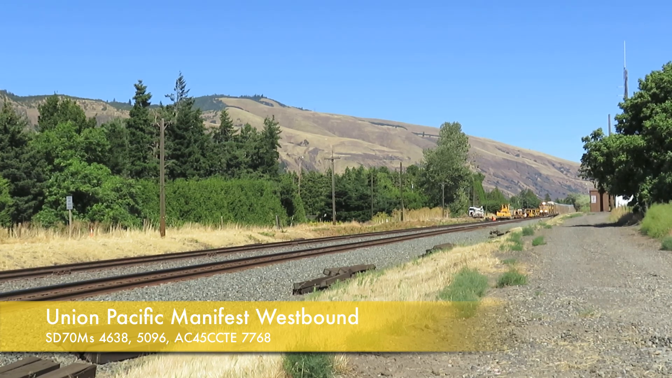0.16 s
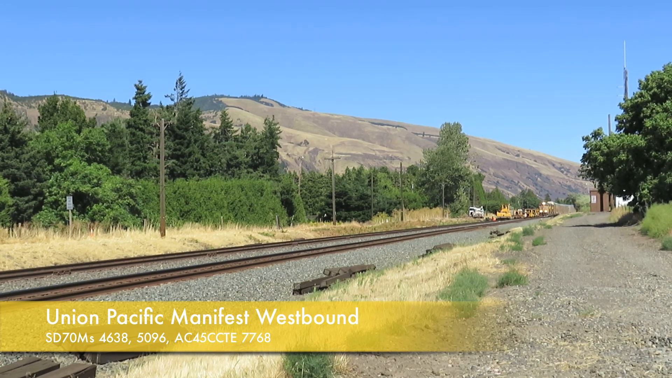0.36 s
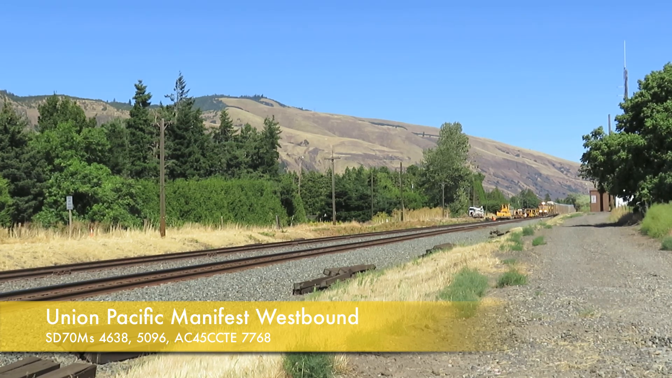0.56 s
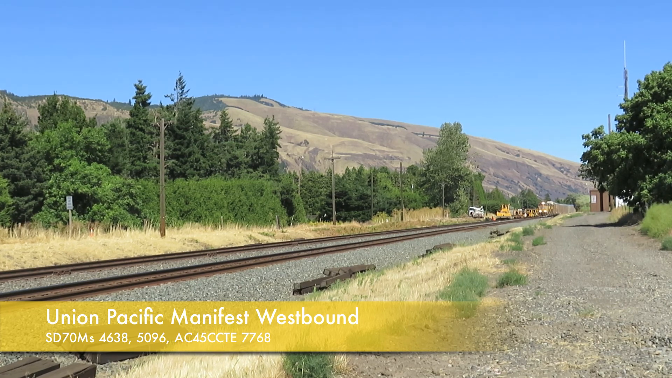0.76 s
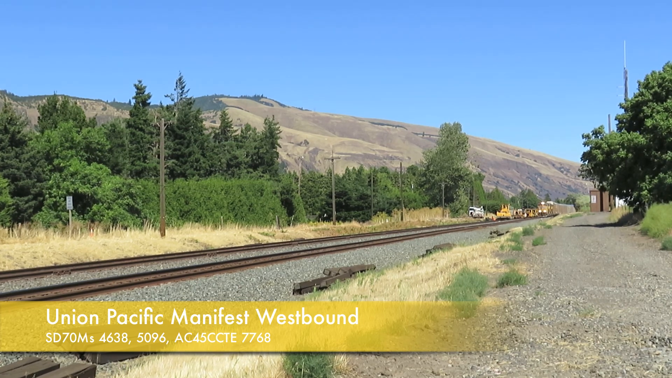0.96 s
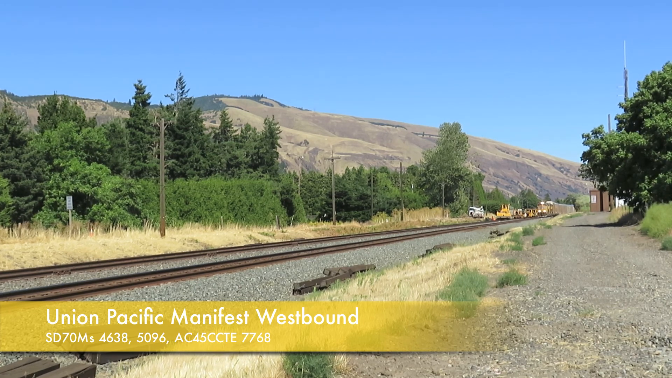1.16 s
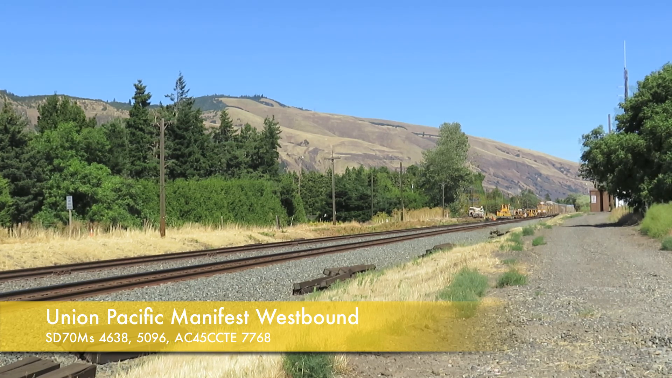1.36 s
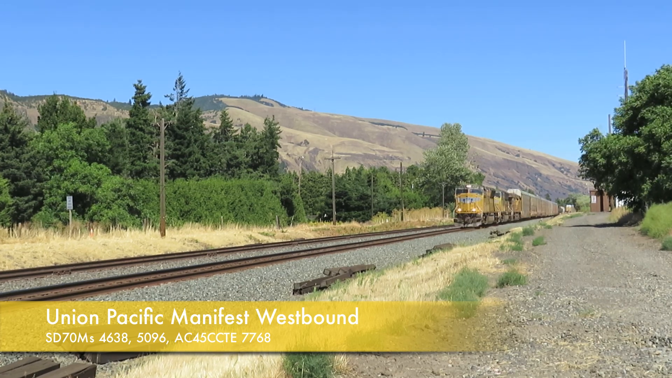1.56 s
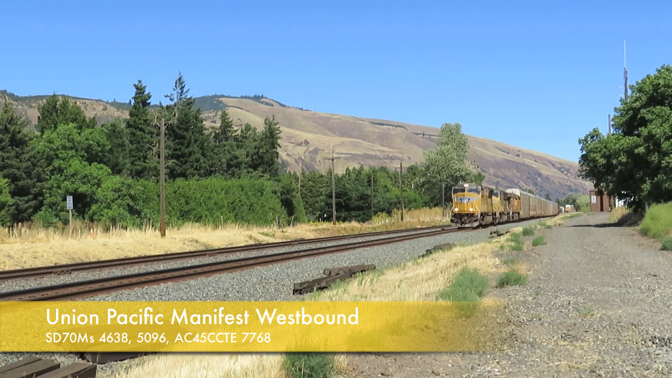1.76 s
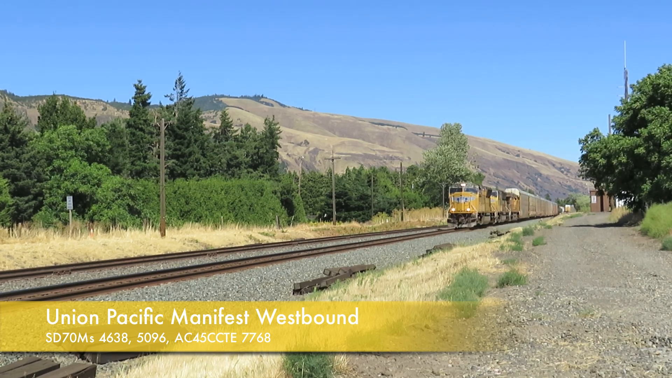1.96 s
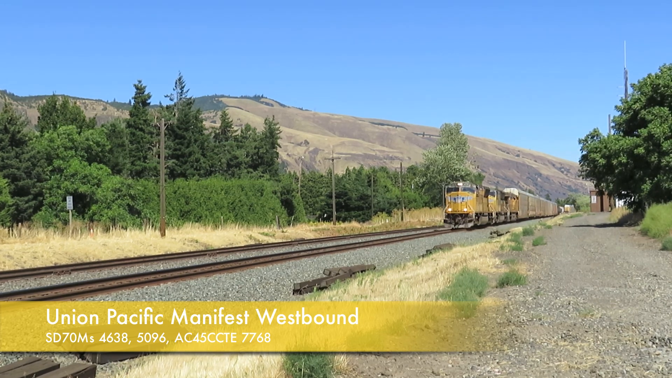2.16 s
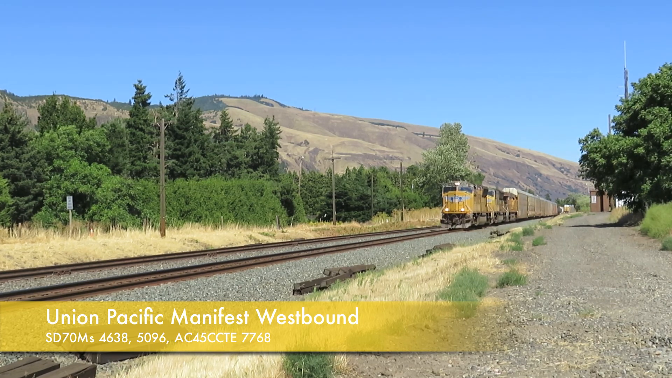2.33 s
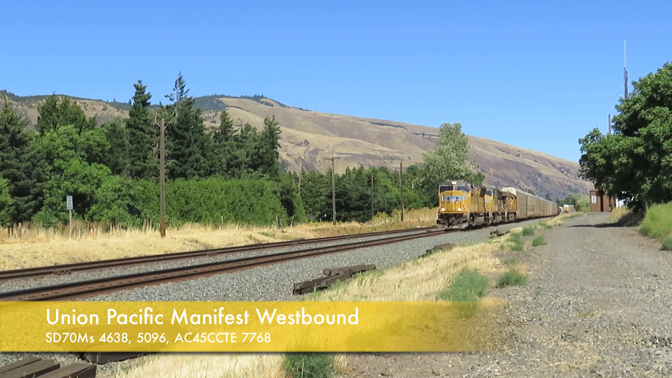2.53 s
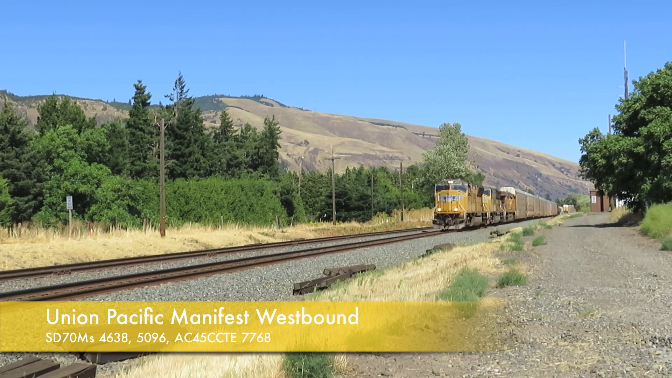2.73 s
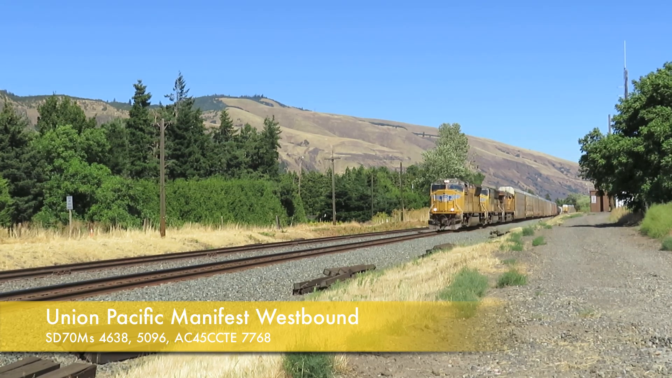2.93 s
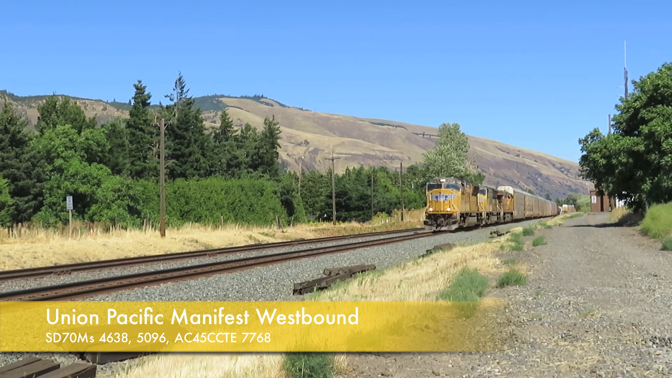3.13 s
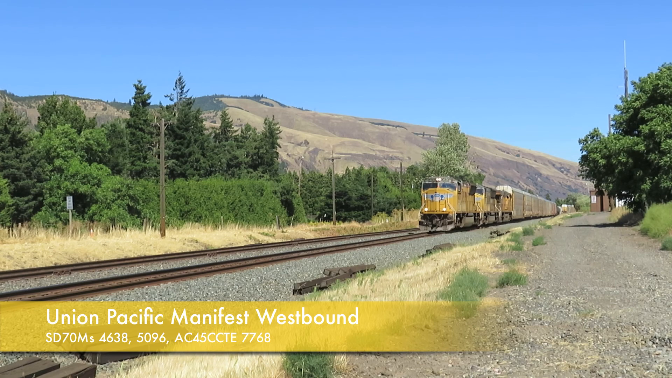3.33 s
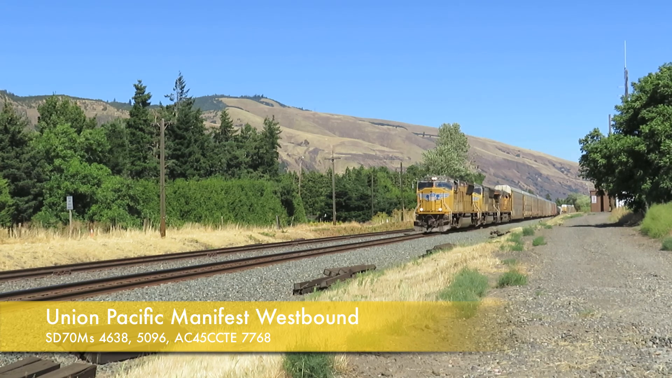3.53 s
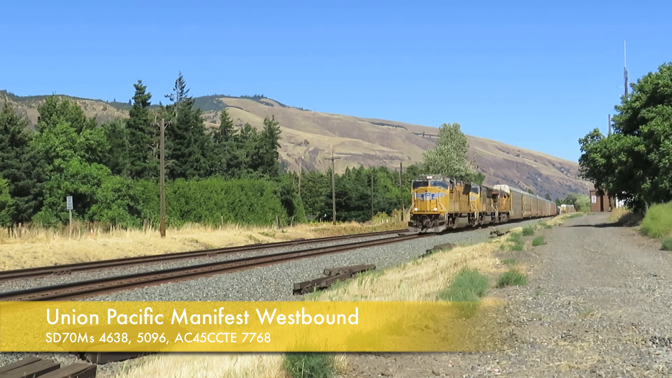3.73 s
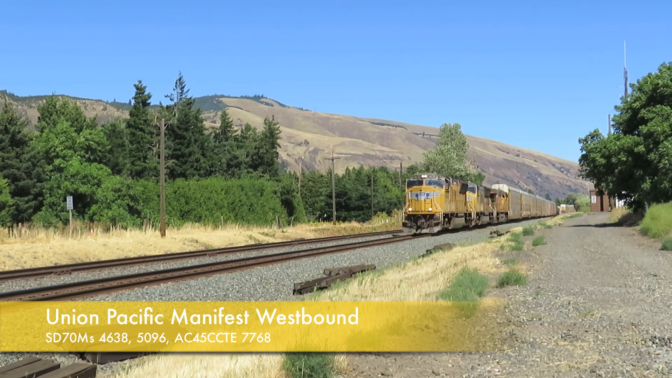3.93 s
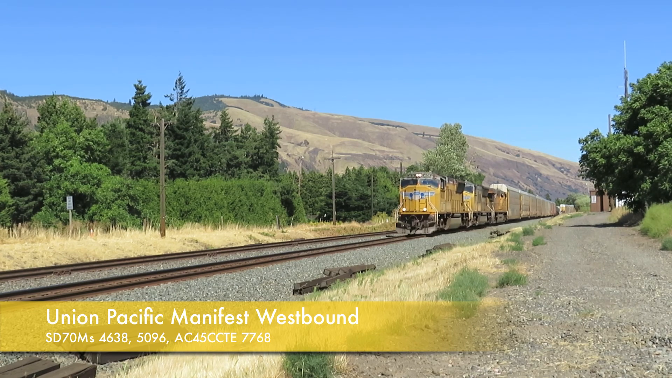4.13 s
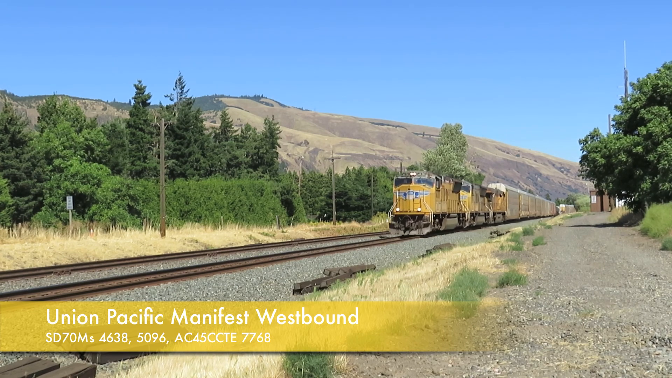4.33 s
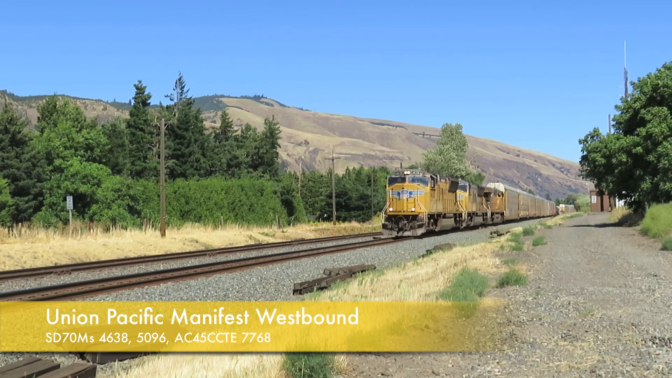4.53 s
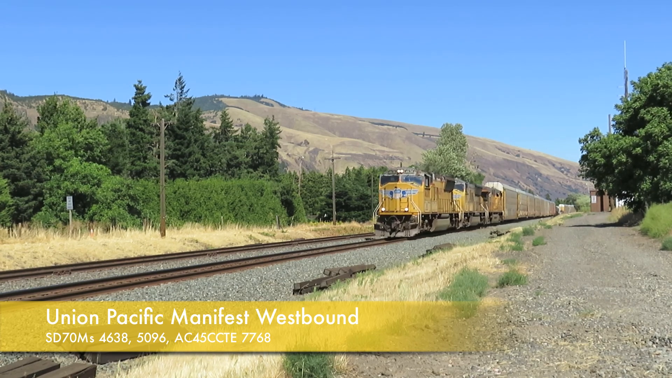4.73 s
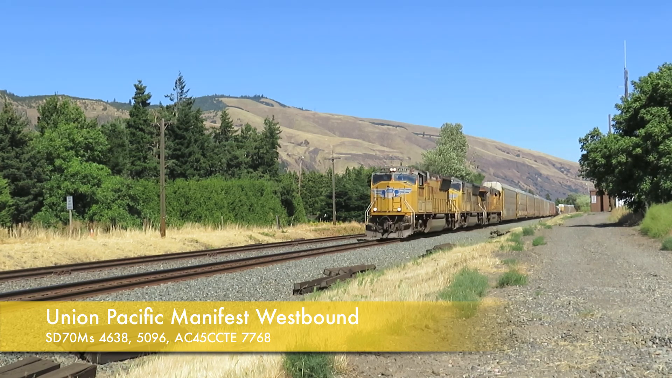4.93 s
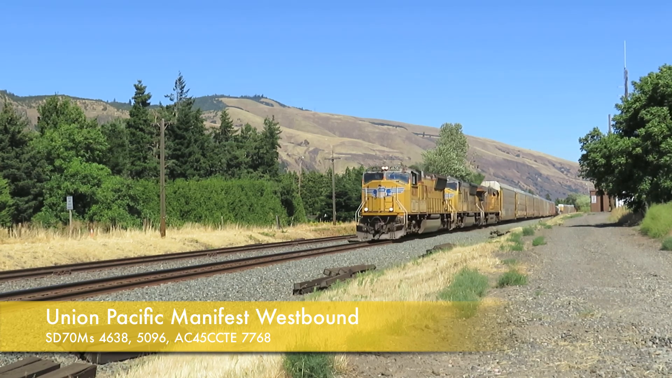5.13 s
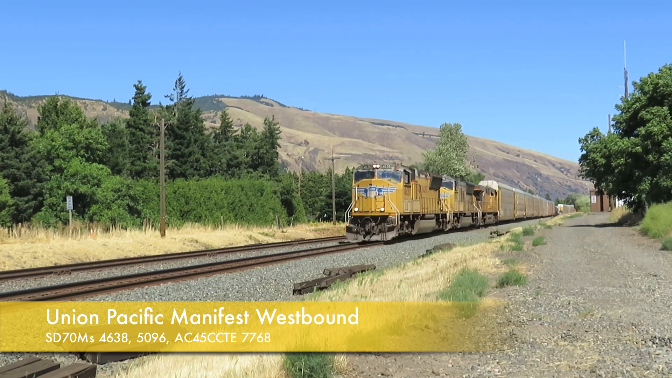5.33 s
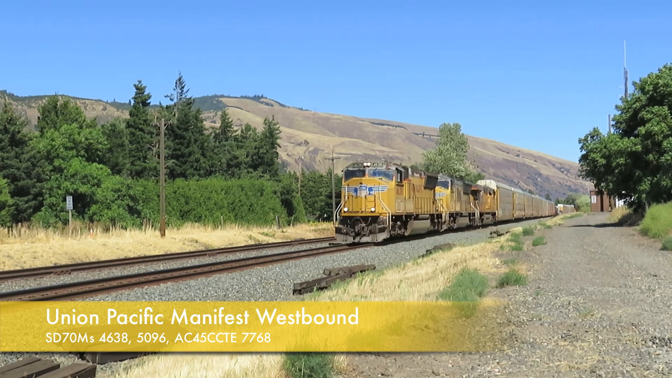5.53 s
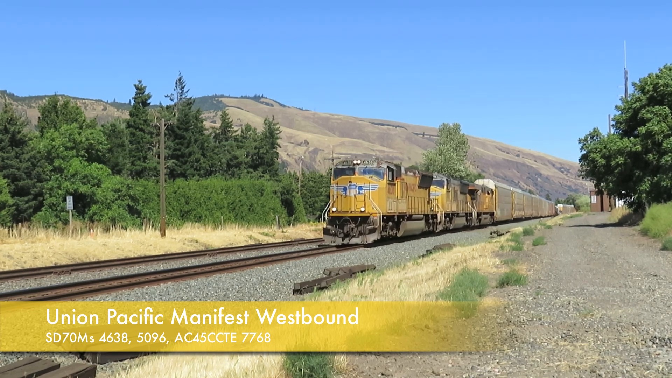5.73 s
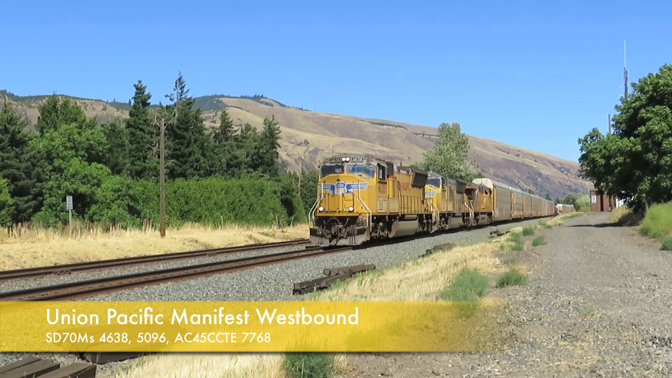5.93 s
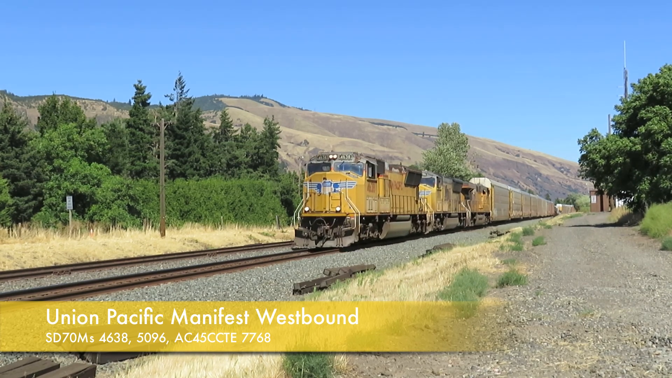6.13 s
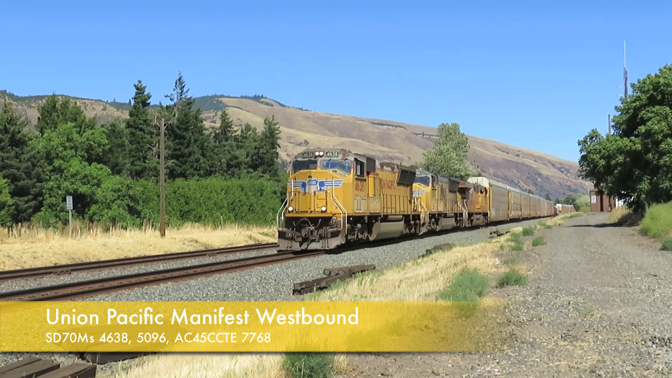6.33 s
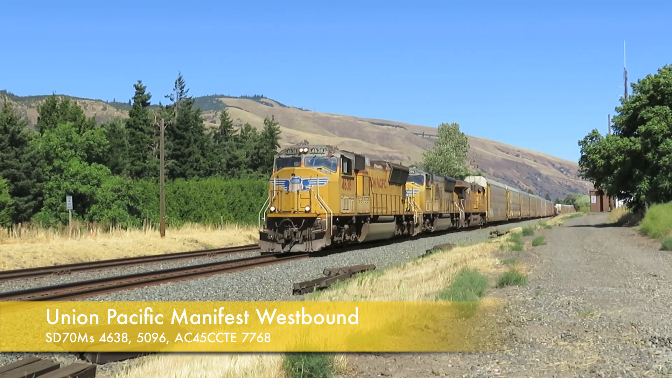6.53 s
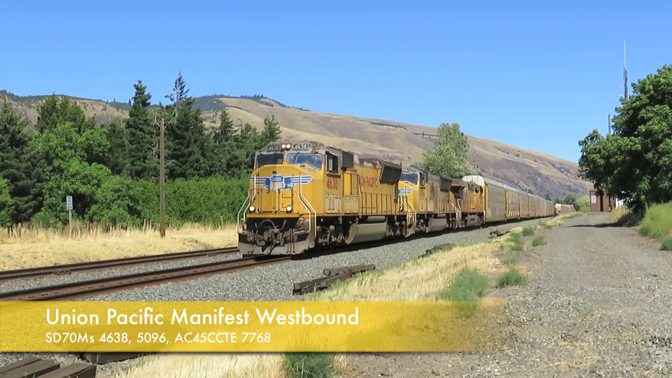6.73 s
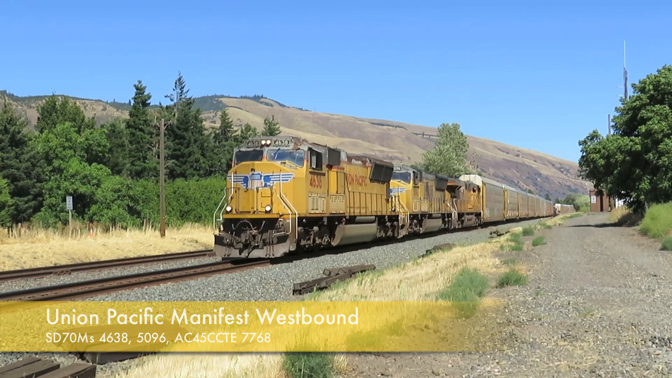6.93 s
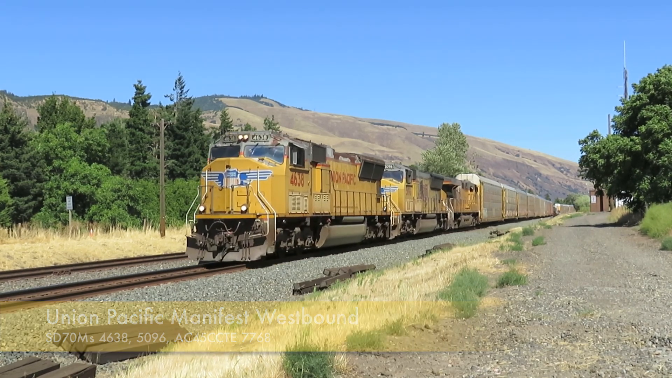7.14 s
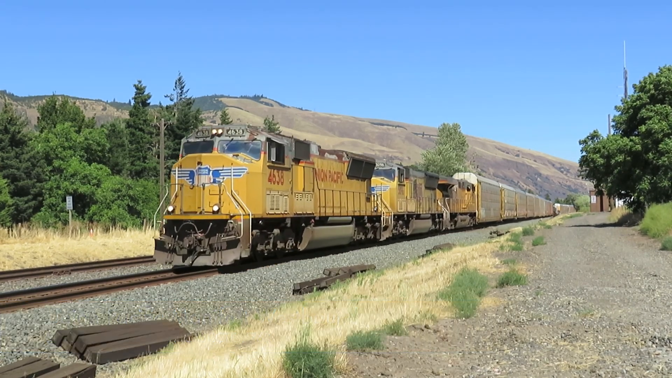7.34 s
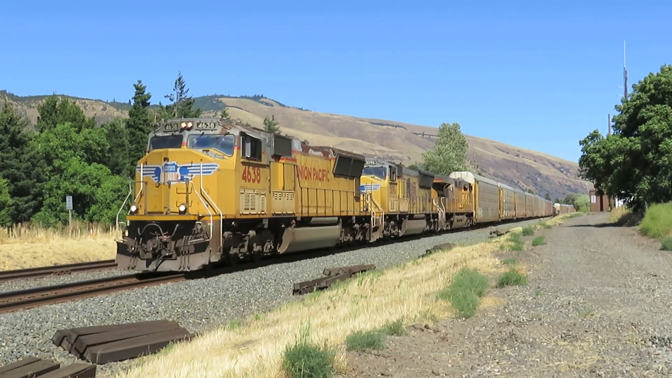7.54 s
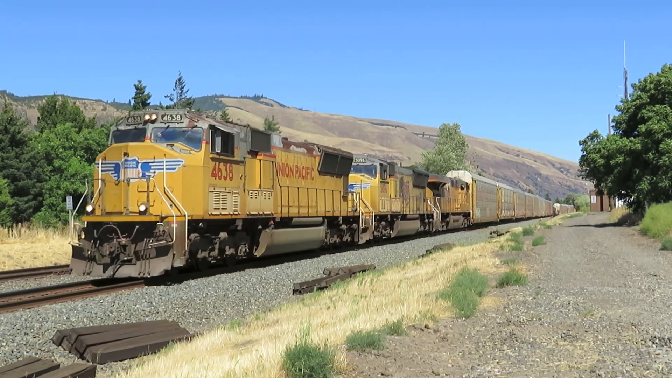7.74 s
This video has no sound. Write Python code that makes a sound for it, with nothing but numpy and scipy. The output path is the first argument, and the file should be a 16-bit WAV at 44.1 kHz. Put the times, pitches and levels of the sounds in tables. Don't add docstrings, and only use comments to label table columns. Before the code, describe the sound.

Rushing train roar gives way to deep pulsing diesel exhaust, a regularly clanging brass bell, humming machinery and puffing air growing nearer.

```python
import sys
import numpy as np
from scipy import signal
from scipy.io import wavfile
from scipy.ndimage import uniform_filter1d

SR = 44100
rng = np.random.default_rng(int(sys.argv[2]) if len(sys.argv) > 2 else 0)


def boost(x):
    u = np.asarray(x, float) / 20
    return 10 ** u


def inscribe(sig):
    pcm = np.round(np.clip(np.atleast_2d(sig).T, -1, 1) * 32767)
    wavfile.write(sys.argv[1], SR, pcm.astype(np.int16))


N = 343539
T = np.arange(N) / SR

# (time [s], share [0-1])
TRAIN_FADE = [
    (1.269, .02),
    (1.33, 0.73),
    (1.5, 0.94),
    (1.76, 0.85),
]
# (time [s], nearness [0-1])
NEARNESS = [(1.5, 0.13), (2.5, 0.14), (3.2, 0.2), (3.7, 0.3), (4.2, 0.39), (4.7, 0.42), (5.2, 0.48),
            (5.6, 0.53), (6, 0.66), (6.3, 0.76), (6.6, 0.74), (6.9, 0.9), (7.2, 0.87), (7.5, 0.93),
            (7.8, 1.02)]

# (frequency [Hz], level per Hz [dB])
ROAR_COLOR = [(15, -49), (25, -44), (86, 2), (101, -4.5), (160, 4), (215, -1), (246, -4.5), (322, -6.5),
              (421, -14), (684, -5.5), (826, -5.5), (2560, -26.5), (5730, -44.5), (15500, -69.5)]
# (frequency [Hz], likeness [0-1])
ROAR_LIKENESS = [(60, 1.), (640, 1), (1500, 0.96), (3400, 0.92), (7000, 0.13)]
# (frequency [Hz], left minus right [dB])
ROAR_BALANCE = [(60, 0.0), (110, 0.0), (200, 0.0), (380, -0.5), (700, -1.0), (1290, -1.5), (2380, -2.0),
                (4400, -1.5), (8120, -0.5), (15000, 0.0)]
# (time [s], level of 45-130 Hz [dB])
GUSTS = [
    (0, -30),
    (.2, -28),
    (.4, -30),
    (.53, -26),
    (.8, -27),
    (1, -30),
    (1.2, -31),
    (1.4, -32),
]

# (frequency [Hz], level per Hz [dB])
FAR_COLOR = [(15, -45), (28, -30.5), (48, -14), (79, -3.5), (110, -16), (140, -22.5), (252, -27.5),
             (319, -30.5), (536, -37), (922, -36), (1620, -42), (2260, -39), (2790, -51), (7000, -67),
             (9100, -107)]
NEAR_COLOR = [(15, -33.5), (28, -22), (79, -9), (130, -19.5), (240, -25), (312, -28), (575, -33.5),
              (922, -28), (1590, -37), (1910, -35), (2800, -43), (4910, -49), (6500, -49), (9100, -79.5)]
# (frequency [Hz], likeness [0-1])
RUMBLE_LIKENESS = [(60, .97), (260, .93), (350, .82), (520, .35), (700, .55), (900, .25), (2000, .4),
                   (4800, .3), (6000, .75), (6500, .98)]
# (frequency [Hz], left lead [rad], left minus right [dB])
RUMBLE_PORTS = [(60, -.3, 2), (200, -.53, 0), (350, -.6, -.5), (520, -2.1, -3), (700, -3.2, -6.5),
                (1300, -3.3, -2.5), (2200, -5.5, -1.5), (2800, -8.2, -1), (3500, -9.4, -.5),
                (4400, -12, -.5), (5400, -15.9, 0), (6500, -15.7, 0), (9700, -9.4, 0)]

# (time [s], peak level [dB])
TURBO_SURGES = [
    (4.6, -54.5),
    (4.85, -63),
    (5.2, -55),
    (5.75, -57),
    (6.11, -46),
    (6.68, -53),
]

HUM_HZ = [180, 310, 441, 667, 933, 1335, 1410, 1865, 4783, 7350, 11000]
# (width [Hz], far level [dB], near level [dB], left minus right [dB], left lead [rad])
HUMS = [(2.33, -49, -30.5, 5.5, -1), (7.04, -46, -32, -1.5, 0.46), (8, -55.5, -40, 1.5, -1.9),
        (7.1, -75.5, -37.5, -18.5, -0.88), (14.5, -59.5, -37, -9.5, 0.52), (5.03, -67, -35.5, -2.5, -.3),
        (15.3, -64.5, -40, 2.5, -1.5), (47, -83, -42, -5, 0.33), (10, -77, -52.5, -1.5, -0.77),
        (201, -76, -45, -2, -1.16), (80, -86.5, -64.5, 6, 0)]
# (time [s], peak level [dB])
WHINE_FLARES = [(1.85, -50.5), (2.4, -53), (2.65, -49), (2.9, -41), (3.35, -44), (3.6, -41.5), (4.0, -32),
                (4.3, -31.5), (4.48, -39), (4.6, -25.5), (4.86, -31), (5.05, -43.5), (5.35, -37.5),
                (6.0, -42)]

# (time [s], level [dB])
CLACKS = [
    (1.835, -47.5),
    (7.318, -36),
]

# (start [s], hold [s], thin hiss level [dB], top hiss above thin hiss [dB])
PUFFS = [(1.66, .08, -78, 16), (2.48, .03, -81, 7), (2.88, .06, -80, 13), (3.79, .12, -64, 2),
         (4.27, .04, -75, 6), (4.57, .33, -54, 4), (4.92, .06, -57, 0), (5.12, .16, -61, 3),
         (5.73, .12, -56, -2), (5.89, .09, -53, 1), (5.99, .1, -59, 6), (6.12, .12, -58, -5),
         (6.31, .04, -54, -7), (6.64, .18, -55, -7), (6.85, .3, -53, -4), (7.23, .12, -46, -6),
         (7.38, .05, -43, -5), (7.5, .15, -52, -3), (7.7, .07, -45, -5)]
# (frequency [Hz], level per Hz [dB])
HISS_COLORS = [
    [(4500, -15.5), (6000, -1.5), (9000, 3), (10500, -2.5), (12000, -25)],
    [(8500, -26), (10000, -9), (12500, -0.5), (13500, -13), (15000, -36.5)],
    [(11500, -34), (13000, -5), (15500, -1.5), (15900, -33)],
]
# (far level [dB], near level [dB])
LEAK = [
    (-84, -51.5),
    (-85, -54.5),
    (-93.5, -61.5),
]

BELL_HZ = [1137, 2170, 2456, 3820, 4070, 6025, 6400, 8183, 10470, 12950, 14620]
# (level [dB], time to fall 60 dB [s], rise [s])
BELL_RING = [(-6, 1.7, 0.038), (1, 0.29, 0.016), (2, 0.62, 0.0022), (-20, 1.1, .01), (-10, 0.88, 0.0066),
             (-15.5, 0.14, 0.01), (-33, .2, 0.011), (-13.5, 0.48, 0.0053), (-27.5, 0.32, 0.0084),
             (-31, .3, .01), (-44, .3, .01)]
# (left minus right [dB], left lead [rad])
BELL_PORTS = [(-4, .25), (0, -1.4), (0, -2.6), (0, -2.9), (0, -2.4), (4, 1.7), (0, 3.1), (0, .15),
              (0, -1.6), (0, 3.1), (0, 0)]
TONE_GROUP = [0, 1, -1, 1, 1, 0, 0, 0, 0, 0, 0]
# (time [s], level [dB], outer tone change [dB], middle tone change [dB])
STROKES = [
    (1.954, -36.5, -15.5, -8),
    (2.72, -35, -17.5, -6.5),
    (3.461, -42, -9, -7),
    (4.222, -31, -16.5, -8),
    (4.991, -38, -6, -4),
    (5.718, -37, 7, 0),
    (6.474, -25.5, 2.5, -4),
    (7.239, -21, 4.5, -4.2),
]

# (tones per crank turn, far level [dB], near level [dB], sway when near [dB], sway crest [s])
LEAD_EXHAUST = [(7, -28, -26, 3, 5.1), (8, -12.5, -9.5, 2, 7.2), (9, -20, -18.5, 5, 6.08),
                (10, -35, -32.5, 2.5, 10)]
# (tones per crank turn, level [dB])
WEAK_EXHAUST = [(5, -39.5), (6, -49), (12, -59), (13, -32), (14, -56.5), (15, -46.5), (17, -36), (22, -37),
                (23, -40.5)]
# (offset [turns], speed [turns/s], change [turns/s^2])
CRANK = (-.0141, 8.4812, -.0023)
# (far level [dB], near level [dB], how late it emerges [power])
TRAIL_EXHAUST = [
    (-33, -32, 1.1),
    (-29.5, -11, 4.5),
    (-38, -17, 1.1),
]
# (frequency [Hz], left lead [rad], left minus right [dB])
BASS_PORTS = [(44.3, 0.3, 4.5), (62.6, -0.41, 2), (95, 0.12, 2), (190, -0.15, 3)]


def evened(x):
    return x / np.sqrt(np.mean(np.abs(x) ** 2) + 1e-20)


def at_pitch(points, hz):
    table_hz, *columns = np.transpose(points)
    return [np.interp(np.log(hz + 1), np.log(table_hz + 1), column) for column in columns]


def at_time(rows, t):
    table_s, *columns = np.transpose(rows)
    return [np.interp(t, table_s, column) for column in columns]


def drift(width_hz):
    r = np.exp(-2 * np.pi * width_hz / SR)
    chance = rng.standard_normal(N) + 1j * rng.standard_normal(N)
    return evened(signal.lfilter([1], [1, -2 * r, r * r], chance))


def spin(hz):
    return np.exp(2j * np.pi * hz * T)


def ports(tone, left_db, lead):
    left = tone.real * boost(left_db / 2)
    right = (tone * np.exp(-1j * lead)).real * boost(-left_db / 2)
    return np.array([left, right])


def noise_grid(size):
    hop = size // 4
    return np.fft.rfftfreq(size, 1 / SR)[:, None], np.arange(N // hop + 5) * hop / SR


def wash(field_db, same, lead, left_db, patchy_db, size, count=(9, 9)):
    a, b, c, d, patches = rng.standard_normal(field_db.T.shape + (5,)).T
    patches = uniform_filter1d(patches, size=count[1], axis=0)
    patches = evened(uniform_filter1d(patches, size=count[0], axis=1))
    same = np.clip(same, 0, 1)
    left = a + 1j * b
    right = same * left * np.exp(-1j * lead) + np.sqrt(1 - same ** 2) * (c + 1j * d)
    z = np.array([left * boost(left_db / 2), right * boost(-left_db / 2)])
    z = z * boost(field_db + patchy_db * patches) * np.sqrt(3 * SR / size / 2)
    return signal.istft(z, nperseg=size, noverlap=size * 3 // 4)[1][:, :N]


def per_hz(points, hz, level_db, lo_hz, hi_hz):
    color, = at_pitch(points, hz)
    band_power = np.sum(boost(2 * color)[(hz > lo_hz) & (hz < hi_hz)]) * hz[1]
    return color + level_db - 10 * np.log10(band_power)


def flares(rows, db_per_s):
    return sum(boost(db - db_per_s * np.abs(T - s)) for s, db in rows)


def roar():
    hz, t = noise_grid(size=1024)
    gust_db = at_time(GUSTS, t)[0] + 28
    field_db = per_hz(ROAR_COLOR, hz, -23, 130, 2000) + gust_db * np.clip((170 - hz) / 60, 0, 1)
    likeness, = at_pitch(ROAR_LIKENESS, hz)
    left_db, = at_pitch(ROAR_BALANCE, hz)
    lead = -2 * np.pi * hz * 2.0 / SR
    return wash(field_db, likeness, lead, left_db, 0.95, size=1024)


def rumble():
    hz, t = noise_grid(size=2048)
    near, = at_time(NEARNESS, t)
    far_db = per_hz(FAR_COLOR, hz, -38.5, 130, 2000)
    near_db = per_hz(NEAR_COLOR, hz, -28.5, 130, 1000)
    field_db = far_db + near * (near_db - far_db)
    likeness, = at_pitch(RUMBLE_LIKENESS, hz)
    lead, left_db = at_pitch(RUMBLE_PORTS, hz)
    return wash(field_db, likeness, lead, left_db, 1.3, size=2048)


def turbo_surge():
    tone = flares(TURBO_SURGES, db_per_s=71.5) * (1 + .5 * drift(25)) * spin(4783)
    return ports(tone, -1.1, -0.7)


def hums():
    near, = at_time(NEARNESS, T)
    out = np.zeros((2, N))
    for hz, (width_hz, far_db, near_db, left_db, lead) in zip(HUM_HZ, HUMS):
        level = boost(far_db + near * (near_db - far_db)) * np.sqrt(2)
        out += ports(level * drift(width_hz) * spin(hz), left_db, lead)
    return out


def whine():
    sag_hz = 16 * np.maximum(T - 1.7, 0) ** 2.17
    hz = np.maximum(2330 - sag_hz, 2030)
    bed = boost(-54) * (T > 1.9) * (T < 3.9)
    level = flares(WHINE_FLARES, db_per_s=121.5) + bed
    flutter = .6 + drift(22)
    return ports(level * flutter * np.exp(2j * np.pi * np.cumsum(hz) / SR), 0, 0.37)


def clacks():
    blows = [(s, db - 11.5 + .4 * offsets[0]) for s, db, *offsets in STROKES]
    level = np.zeros(N)
    for s, db in list(CLACKS) + blows:
        level += boost(db - 60 * np.maximum(T - s, 0) / 0.12) * (T > s)
    band = signal.butter(2, [1200 / SR * 2, 4500 / SR * 2], "band")
    knock = signal.lfilter(*band, rng.standard_normal((2, N)))
    return level * evened(knock)


def vents(t):
    rise_db_per_s, fall_db_per_s = 498.5, 130
    near, = at_time(NEARNESS, t)
    power = np.array([boost(2 * (far_db + near * (near_db - far_db))) for far_db, near_db in LEAK])
    for s, hold, db, top_db in PUFFS:
        opening_db = rise_db_per_s * np.maximum(s - t, 0)
        closing_db = fall_db_per_s * np.maximum(t - s - hold, 0)
        hiss_db = np.array([[-10.5 - 1.3 * top_db], [0], [top_db]])
        power = power + boost(2 * (db - opening_db - closing_db + hiss_db))
    return power


def air():
    hz, t = noise_grid(size=1024)
    flow = vents(t)
    power = 0
    for color, part in zip(HISS_COLORS, flow):
        inside = (hz > color[0][0]) * (hz < color[-1][0])
        power = power + boost(2 * (at_pitch(color, hz)[0] - 33)) * part * inside
    lead = np.pi + 2 * np.pi * hz * 13.8 / SR - .2
    hiss = wash(10 * np.log10(power + 1e-14), .995, lead, 0, 4.3, size=1024, count=(30, 1))
    whistle_level = boost(-12) * np.interp(T, t, np.sqrt(flow[1]))
    return hiss + ports(whistle_level * drift(20) * spin(9600), 0, np.pi)


def bell():
    out = np.zeros((2, N))
    for hz, (db, t60, rise), port, group in zip(BELL_HZ, BELL_RING, BELL_PORTS, TONE_GROUP):
        ring = np.zeros(N)
        for s, blow_db, *offsets in STROKES:
            age = np.maximum(T - s, 0)
            tone_db = blow_db + [*offsets, 0][group] - 60 * (age / t60) ** 1.84
            fresh = boost(tone_db) * np.clip(age / rise, 0, 1)
            ring = np.maximum(ring, fresh)
        flutter = 1 + 0.77 * min(hz / 4000, 1.1) ** 0.8 * drift(29)
        out += ports(boost(db) * ring * flutter * spin(hz), *port)
    return out


def lead_exhaust():
    stack_hz, stack_width_hz, sway_s = 71, 12, 2.54
    turns = np.polyval(CRANK[::-1], T)
    near, = at_time(NEARNESS, T)
    tones = []
    for k, far_db, near_db, sway_db, crest in LEAD_EXHAUST:
        sway = sway_db * np.cos(2 * np.pi * (T - crest) / sway_s)
        tones.append((k, far_db + near * (near_db - far_db + sway)))
    out = np.zeros((2, N))
    for k, db in tones + list(WEAK_EXHAUST):
        hz = k * CRANK[1]
        lag = np.arctan(2 * (hz - stack_hz) / stack_width_hz) + 1 / 2
        lead, left_db = at_pitch(BASS_PORTS, hz)
        out += ports(boost(db - left_db / 2) * np.exp(1j * (2 * np.pi * k * turns - lag)), left_db, lead)
    return out


def trailing_exhaust():
    near, = at_time(NEARNESS, T)
    out = np.zeros((2, N))
    for k, lag_cycles, (far_db, near_db, late) in zip((2, 4, 5), (0, .17, -.08), TRAIL_EXHAUST):
        hz = k * 23.003
        db = far_db + (near_db - far_db) * np.abs(near) ** late
        lead, left_db = at_pitch(BASS_PORTS, hz)
        tone = boost(db - left_db / 2) * np.exp(2j * np.pi * (hz * T - lag_cycles))
        out += ports(tone, left_db, lead)
    return out


def scene():
    s, share = np.transpose(TRAIN_FADE)
    coming = np.clip(np.interp(T, s, share, left=0, right=1), 0, 1)
    leaving = np.clip((1.76 - T) / 0.47, 0, 1) ** 1.13
    train = rumble() + turbo_surge() + hums() + whine() + clacks() + air() + bell()
    train = train + lead_exhaust() + trailing_exhaust()
    return leaving * roar() + coming * train


def roll_off(x):
    return signal.sosfilt(signal.butter(12, 16510, fs=SR, output="sos"), x)


def record(dry):
    over = np.maximum(np.abs(dry) - .6, 0)
    rounded = dry - np.sign(dry) * (over - .33 * np.tanh(over / .33))
    treble_edge = signal.firwin(511, 15800, window=("kaiser", 9), fs=SR)
    mix = signal.oaconvolve(rounded, treble_edge[None], "same")
    return roll_off(mix)


dry = scene()
out = record(dry)
inscribe(out)
```